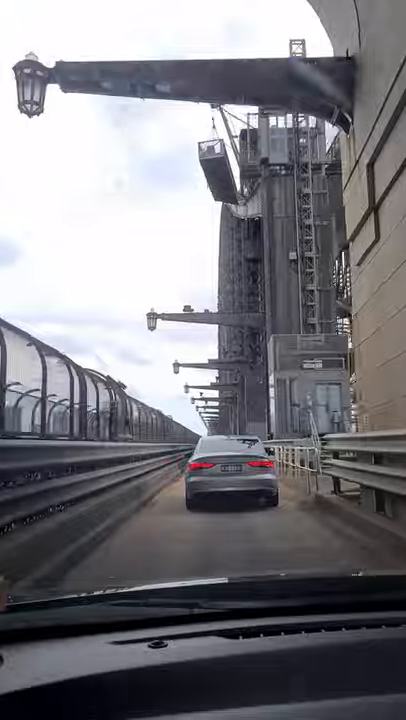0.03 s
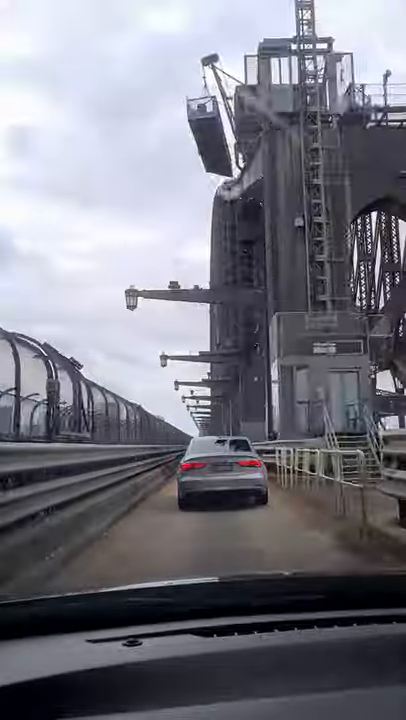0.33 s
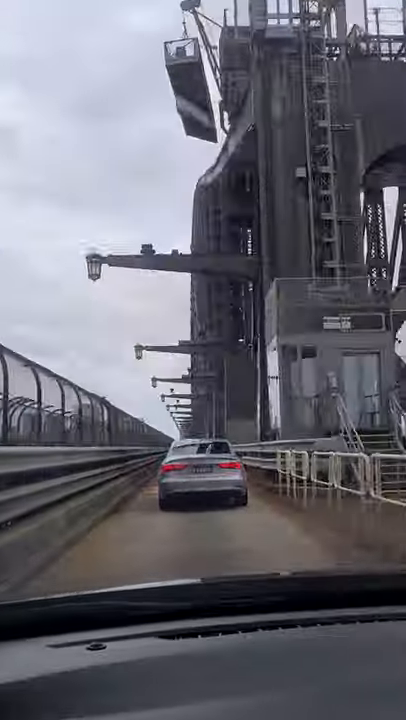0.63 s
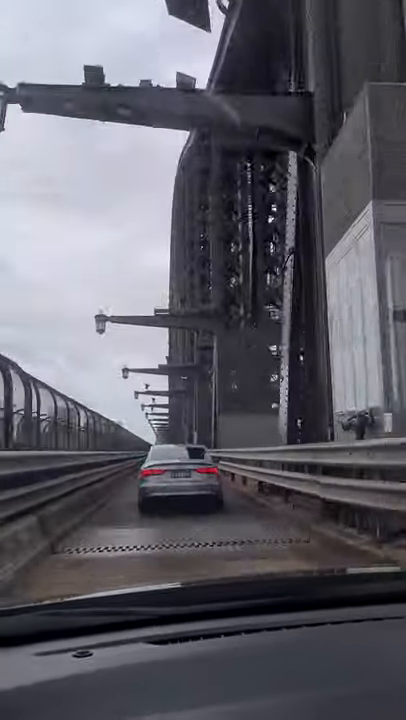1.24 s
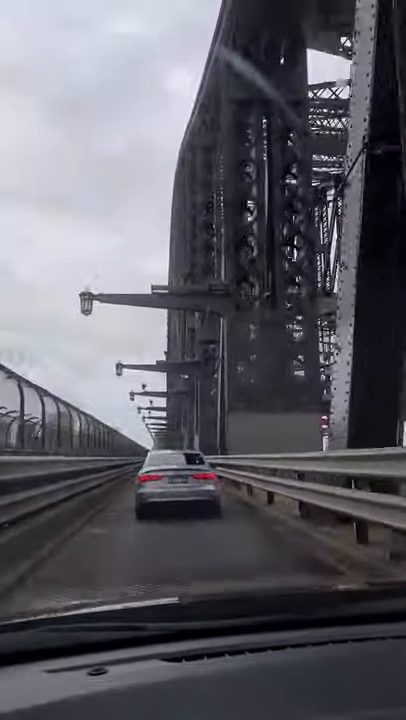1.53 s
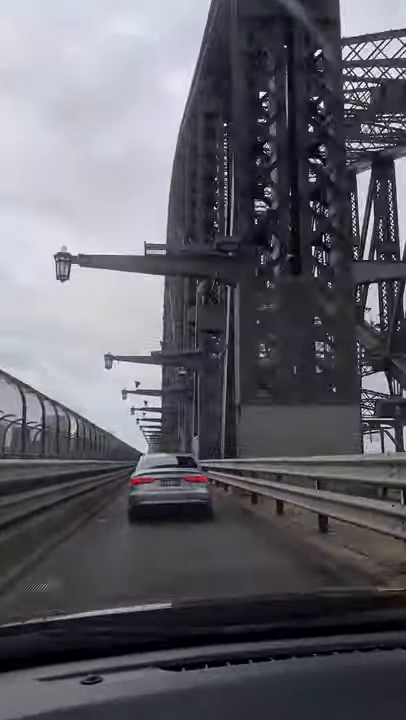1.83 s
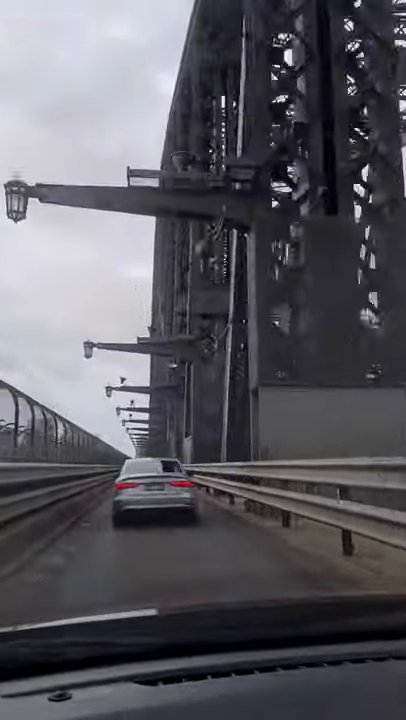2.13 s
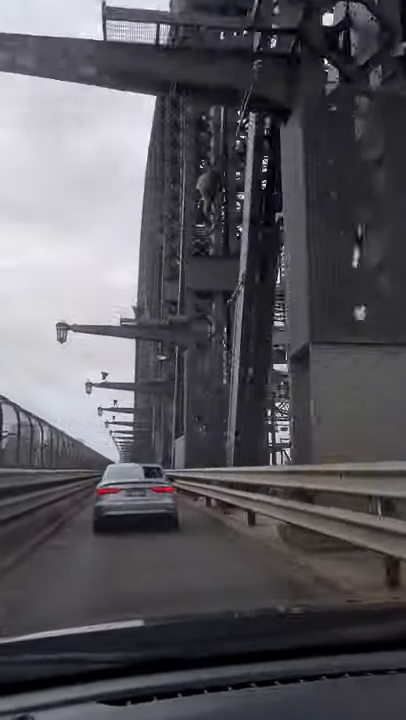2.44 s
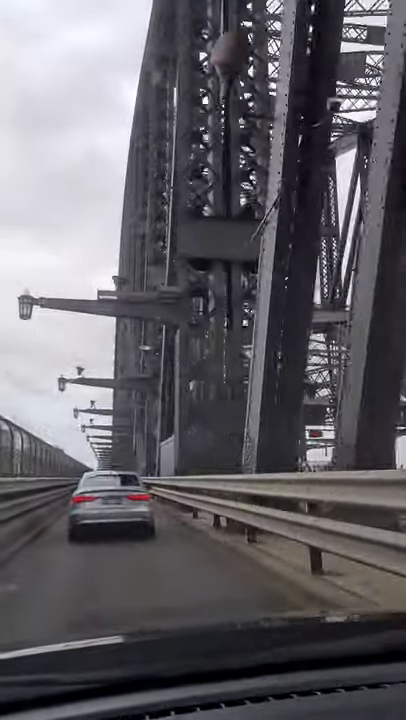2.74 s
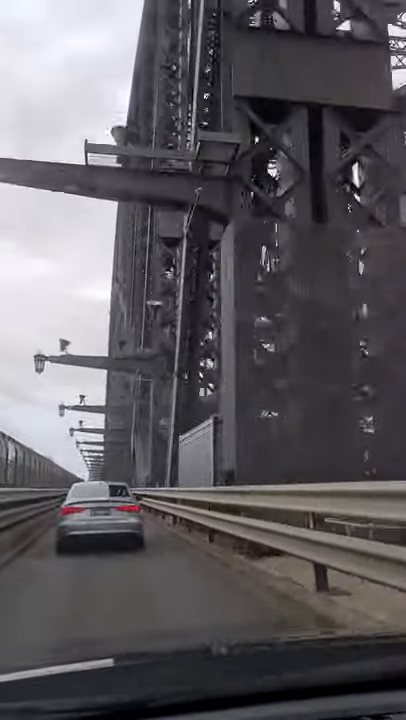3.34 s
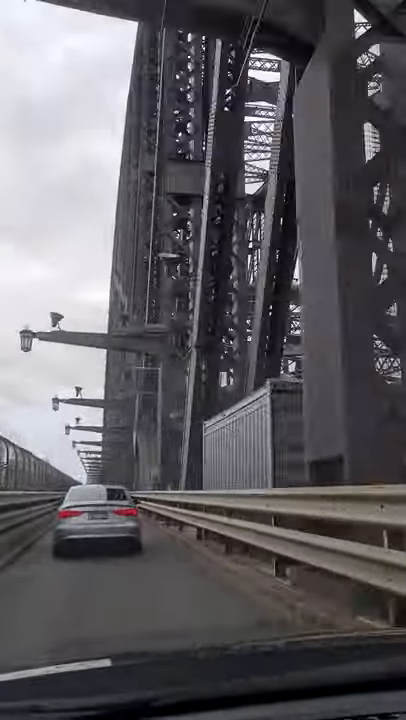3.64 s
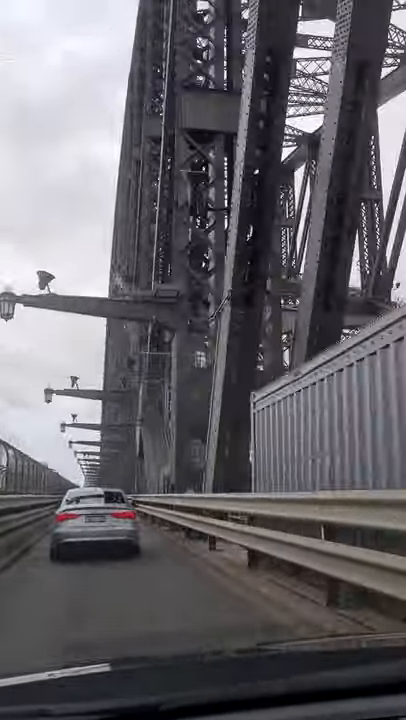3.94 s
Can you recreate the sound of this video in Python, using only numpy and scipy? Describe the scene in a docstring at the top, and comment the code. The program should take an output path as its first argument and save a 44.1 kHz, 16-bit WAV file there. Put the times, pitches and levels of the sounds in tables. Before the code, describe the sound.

A car drives steadily, heard from inside, thumping once with each axle over a ribbed joint.

```python
"""Driving over a steel bridge

Heard from inside the car, a stereo microphone behind the windscreen. The car gathers speed gently and the
engine booms in the cabin over road rumble and tyre roar. Midway both axles cross a ribbed expansion joint:
the body thumps, the ribs drum through the tyres, loose trim ticks. Trim squeaks faintly as the car sways."""
import sys
import numpy as np
from scipy import signal
from scipy.fft import rfft, irfft
from scipy.io import wavfile

SR = 44100
rng = np.random.default_rng(int(sys.argv[2]) if len(sys.argv) > 2 else 0)


def digitize_waveform(pressure):
    """Quantize a signal to 16-bit integers and store it at the path in sys.argv[1].

    Rows of a 2-D input are taken as channels; values are limited to [-1, 1].
    """
    field = np.atleast_2d(pressure).T
    bounded = np.clip(field, -1, 1)
    quanta = np.round(bounded * 32767).astype(np.int16)
    wavfile.write(sys.argv[1], SR, quanta)


N = 176400
TIME = np.arange(N) / SR
FREQ = np.fft.rfftfreq(N, 1 / SR)

# rush of the tyres on steel: frequency_hz, level_db
STEEL_RUSH = [(50, -20.5), (110, 3.5), (180, 4), (235, -0.5), (280, -9), (340, -7.5), (480, -15),
              (700, -18.5), (950, -20.5), (1400, -24), (2200, -39), (3500, -53), (6000, -65)]
# balance of the cabin noise at the microphone: frequency_hz, left_minus_right_db
CABIN_BALANCE = [(40, 0.5), (190, -0.5), (340, 4), (520, 3), (690, -4), (780, 1.5), (1000, -4), (1110, -3),
                 (1250, -4), (1700, -1), (2400, -0.5), (3050, 2.5), (4000, -4), (7000, -9), (8300, -4.5),
                 (9600, -18), (12000, -10.5)]


def engine(waver_db=.97, overtone_waver_db=2.5, drone_hz=151.5, drone_width_hz=3.2, drone_db=15):
    """The firing booms in the cabin; as it quickens, its second harmonic fades and its third resonates."""
    # engine speed: time_s, firing_hz
    firing = [(0, 47.53), (.6, 48.1), (1.2, 47.84), (1.8, 48.97), (2.5, 49.36), (3.2, 50.15), (4, 50.81)]
    # the boom under changing load: time_s, level_db
    load = [(0, -31), (.25, -23.5), (.7, -24.5), (1.0, -19.5), (1.3, -19), (1.5, -23), (2.1, -23),
            (2.7, -19.5), (3.4, -22), (4, -19.5)]
    # overtones: firing_multiple, level_against_boom_db, change_at_speed_db
    overtones = [(2, -14, -10.5), (3, -25, 0.5), (4, -24, 0), (5, -31.5, 6)]
    hz = curve(firing)
    angle = 2 * np.pi * np.cumsum(hz) / SR
    lag_s = np.array([[.0004], [0]])  # the boom reaches the left side later
    out = np.sin(angle - 2 * np.pi * hz * lag_s) * amp(waver_db * drift(rate_hz=2.1))
    sped_up = np.clip((hz - 50) / .4 + .5, 0, 1)  # 0 to 1 as the firing passes 50 Hz
    for order, db, change_db in overtones:
        resonance_db = drone_db / (1 + ((order * hz - drone_hz) / (drone_width_hz / 2)) ** 2)
        tone = np.sin(order * angle + 2 * np.pi * rng.random())
        out += tone * amp(db + change_db * sped_up + resonance_db + overtone_waver_db * drift(rate_hz=4.9))
    return np.sqrt(2) * out * amp(curve(load)) * pan(db=-.5)


def joint():
    """Both axles cross the expansion joint, just under the floor; its steel plates ring hollow."""
    # tyres rushing over the plates: middle_s, half_length_s, level_db
    crossings = [(1.728, 0.023, -31), (1.835, .055, -25), (1.965, .07, -28)]
    # heavy thumps of the body: middle_s, peak_db, pitch_hz
    thumps = [(1.706, -13.5, 42.2), (1.814, -14.5, 43.3), (1.945, -8, 43.3), (2.065, -8.5, 38.3)]
    # tyres slapping the plate edges: start_s, peak_db, pitch_hz
    slaps = [(1.652, -12, 150), (1.706, -16.5, 151), (1.859, -18.5, 153), (1.894, -13, 125),
             (1.927, -18.5, 177), (1.968, -16.5, 141.4), (2.163, -19, 135.6)]
    # tyres drumming on the ribs: start_s, length_s, peak_db, first_rate_hz, last_rate_hz
    rib_runs = [(1.724, 0.105, -12, 129.6, 122.9), (1.805, .082, -11.5, 111.6, 104.6),
                (1.92, 0.14, -20.5, 104.5, 134.8)]
    rush = cabin_noise(STEEL_RUSH)
    plate_ring = amp(-21) * ringing(hz=449, width_hz=35)
    out = (rush + plate_ring) * swells(crossings)
    for middle_s, db, hz in thumps:
        out += amp(db) * body_thump(middle_s, hz)
    for start_s, db, hz in slaps:
        add(out, start_s, amp(db) * tyre_slap(hz))
    for start_s, length_s, db, first_hz, last_hz in rib_runs:
        add(out, start_s, amp(db) * rib_drum(length_s, first_hz, last_hz))
    return out + clatter() + knock()


def body_thump(middle_s, hz, width_s=.021):
    """The body heaves on its springs: two or three deep cycles."""
    t = TIME - middle_s
    return np.exp(-.5 * (t / width_s) ** 2) * np.sin(2 * np.pi * hz * t)


def tyre_slap(hz, rise_s=.0075, grit=.21):
    """A tyre meets a plate edge with a cushioned blow: a few cycles that swell and die away."""
    t = np.arange(SR // 3) / SR
    swell = (t / rise_s * np.exp(1 - t / rise_s)) ** 2
    return swell * (np.sin(2 * np.pi * hz * t) + grit * cabin_noise(STEEL_RUSH)[:, :len(t)])


def rib_drum(length_s, first_hz, last_hz, roughness=.26, octave_db=-21):
    """A tyre rolls over evenly spaced ribs: a rough low note that glides with the rib rate."""
    progress = np.linspace(0, 1, round(length_s * SR))
    angle = 2 * np.pi * np.cumsum(first_hz + (last_hz - first_hz) * progress) / SR
    note = np.sin(angle) + amp(octave_db) * np.sin(2 * angle)
    swell = np.sqrt(abs(np.sin(np.pi * progress)))
    return swell * note * (1 + roughness * drift(rate_hz=47)[:len(note)])


def clatter(clicks_per_s=600, spread_db=3):
    """Grit and loose fittings make small, uneven clicks while the tyres are on the ribs."""
    # colour of the clicks: frequency_hz, level_db
    colour = [(500, -17), (1500, 2.5), (2500, 2), (4000, -8.5), (6500, -24.5), (9000, -27.5), (15000, -36)]
    # bursts of clatter: middle_s, half_length_s, level_db
    bursts = [(1.72, 0.029, -55.5), (1.835, 0.043, -57.5)]
    hits = rng.random((2, N)) < clicks_per_s / SR
    sizes = amp(spread_db * np.minimum(rng.exponential(1, (2, N)), 3))
    clicks = hits * sizes * rng.choice([-1, 1], (2, N))
    side_db = spectrum(CABIN_BALANCE) / 2
    response = amp(spectrum(colour) + np.array([side_db, -side_db]))
    return unit(irfft(rfft(clicks) * response, N)) * swells(bursts)


def knock(at_s=1.702, edge_s=.00004, body_s=.00011):
    """A loose fitting knocks once, hard, as the front wheels meet the joint."""
    edge, body = (TIME - at_s) / edge_s, (TIME - at_s) / body_s
    return amp(-33.5) * (edge * np.exp(-edge ** 2) + amp(-1) * body * np.exp(-body ** 2))


def road_rumble(lumps_db=.2):
    """The roughness of the road comes up through the suspension."""
    # colour of the rumble: frequency_hz, level_db
    colour = [(10, -27.5), (24, -12), (34, -7), (44, 1.5), (62, -1), (75, -5), (100, -4), (135, -1.5),
              (168, -7), (200, -9), (270, -17), (330, -15.5), (400, -19.5), (500, -21.5), (640, -31),
              (900, -45.5), (2000, -94)]
    # rougher and smoother stretches: time_s, level_db
    level = [(0, -27), (.6, -26), (1.2, -27), (1.65, -25), (2.1, -28), (2.5, -28.5), (3.0, -28),
             (3.5, -26.5), (4, -28)]
    return cabin_noise(colour) * amp(curve(level) - lumps_db * drift(rate_hz=4))


def wheels():
    """The wheels hop on their springs and the hollow tyres hum."""
    # wheel hop: time_s, level_db
    hop_level = [(0, -37.5), (.5, -36.5), (.72, -23), (.95, -42.5), (1.3, -25.5), (1.65, -28.5),
                 (2.0, -26.5), (2.25, -31.5), (2.5, -34), (3.2, -30), (3.45, -43), (4, -33.5)]
    # tyre hum: time_s, level_db
    hum_level = [(0, -34.5), (.55, -31), (1.1, -36.5), (1.7, -34), (2.2, -38), (2.8, -39.5), (3.5, -32.5),
                 (4, -33)]
    hop = ringing(hz=31.5, width_hz=5.6) * amp(curve(hop_level))
    hum = ringing(hz=161.8, width_hz=26) * amp(curve(hum_level))
    return hop + hum


def tyre_roar(span_from_s=1.85, crossfade_s=.059, flutter_db=.72):
    """The tyres roar outside the glass, fluttering with the grain of the asphalt."""
    # roar on the approach: frequency_hz, level_db
    approach = [(200, -31.5), (500, -10), (660, 2.5), (800, -1), (930, -2), (1100, -1.5), (1350, -1.5),
                (1650, -8), (2000, -14.5), (2400, -20), (2900, -24.5), (3600, -31.5), (4600, -40.5),
                (8000, -63.5)]
    # roar on the smoother span: frequency_hz, level_db
    span = [(200, -31), (500, -3), (680, -0.5), (800, -2), (1000, -2), (1150, -4.5), (1450, -3.5),
            (1650, -7), (1900, -12), (2400, -20.5), (2900, -23.5), (3600, -33.5), (4600, -42.5),
            (8000, -62)]
    # strength of the roar: time_s, level_db
    level = [(0, -42), (.25, -42.5), (.6, -41.5), (1.2, -41.5), (1.6, -41.5), (1.95, -44.5), (2.15, -44),
             (2.6, -42.5), (3.1, -42), (3.5, -41.5), (4, -41)]
    on_span = np.clip((TIME - span_from_s) / crossfade_s + .5, 0, 1)
    roar = np.sqrt(1 - on_span) * cabin_noise(approach) + np.sqrt(on_span) * cabin_noise(span)
    return roar * amp(curve(level) + flutter_db * drift(rate_hz=22))


def trim_ticks():
    """Loose plastic trim ticks when jolted, to the right of the microphone."""
    # ticks: start_s, level_db, centre_hz, width_octaves, decay_s, left_minus_right_db
    ticks = [(1.7165, -53.5, 15000, .2, 0.0042, -17), (1.716, -64, 6000, .4, 0.005, -12),
             (1.731, -62, 10000, .3, .005, -19.5), (1.782, -61.5, 4500, .4, .005, -6),
             (1.871, -62.5, 14700, .25, .007, -16), (1.869, -64, 6260, 0.16, 0.0046, -8),
             (3.265, -76.5, 5800, .3, .007, -12), (3.52, -79, 7100, .6, .008, -14),
             (3.897, -73.5, 8000, .6, .007, -12)]
    out, t = np.zeros((2, N)), np.arange(SR // 10) / SR
    for start_s, db, hz, octaves, decay_s, pan_db in ticks:
        band = np.exp(-.5 * (np.log2((FREQ + 1) / hz) / octaves) ** 2)
        tick = shaped_noise(band)[:len(t)] * np.exp(-t / decay_s)
        add(out, start_s, amp(db) * pan(pan_db) * tick)
    return out


def trim_rustle(flutter_db=.7):
    """Trim shaken by the asphalt gives a fine, high rustle."""
    # colour of the rustle: frequency_hz, level_db
    colour = [(2000, -4), (4000, -2), (6000, 1), (7400, 3), (8100, -2), (8700, -8), (9800, -5.5),
              (12000, -8.5), (15500, -13)]
    # strength of the rustle: time_s, level_db
    level = [(0, -70.5), (.22, -73), (.5, -75.5), (.75, -80), (1.35, -70.5), (1.6, -72.5), (1.72, -66.5),
             (1.87, -67), (2.0, -70.5), (2.35, -71.5), (2.52, -69.5), (2.65, -76), (3.0, -78), (3.1, -72.5),
             (3.2, -79.5), (4, -79)]
    return cabin_noise(colour) * amp(curve(level) + flutter_db * drift(rate_hz=30))


def trim_squeaks(bend=.07, jitter=.017, scratch_db=4):
    """Plastic trim squeaks faintly in small, scratchy arches of pitch."""
    # squeaks: start_s, length_s, level_db, top_pitch_hz, left_minus_right_db
    squeaks = [(0.259, .15, -82.5, 7200, -3), (.44, .1, -78, 7420, 1.5), (.885, .05, -86.5, 10300, -16),
               (1.186, .045, -83, 11400, -16), (2.13, .04, -75, 7500, -7), (2.255, 0.058, -75, 7600, -2),
               (2.402, .08, -73.5, 7400, -8), (2.484, 0.099, -75, 7500, -5)]
    out = np.zeros((2, N))
    for start_s, length_s, db, top_hz, pan_db in squeaks:
        arch = abs(np.sin(np.linspace(0, np.pi, round(length_s * SR))))
        hz = top_hz * (1 - bend * (1 - arch) + jitter * drift(rate_hz=400)[:len(arch)])
        scratch = unit(amp(scratch_db * drift(rate_hz=250)[:len(arch)]))
        tone = np.sin(2 * np.pi * np.cumsum(hz) / SR)
        add(out, start_s, amp(db) * pan(pan_db) * scratch * np.sqrt(2 * arch) * tone)
    return out


def cabin_noise(colour):
    """Noise coloured by the cabin: alike left and right in the bass, diffuse higher up."""
    # likeness of the microphone's two sides: frequency_hz, coherence
    likeness = [(30, 0.98), (110, 1), (180, 0.93), (300, 0.91), (480, .66), (650, 0.49), (1000, 0.099),
                (1550, 0.28), (2500, .15), (8000, .3)]
    # phase between the sides: frequency_hz, left_lead_rad
    lead = [(40, 0.52), (200, -0.49), (430, 1), (860, -0.07), (1210, -1.5), (1550, -3.5), (2070, -6),
            (2500, -6), (2840, -7.5)]
    # standing waves of the cabin: centre_hz, width_hz, lift_db
    standing_waves = [(223, 8.8, 2.5), (307, 16, 2.5), (480, 41, 2), (660, 67, -3.5), (938, 24, 3),
                      (1023, 50, 3.5), (1260, 56, 2.5), (1867, 56, 3.5)]
    left, diffuse = rfft(rng.standard_normal((2, N)))
    coherence, side_db = spectrum(likeness), spectrum(CABIN_BALANCE) / 2
    right = (coherence * left + np.sqrt(1 - coherence ** 2) * diffuse) * np.exp(-1j * spectrum(lead))
    sides = np.array([left * amp(side_db), right * amp(-side_db)])
    waves_db = sum(db / (1 + (2 * (FREQ - hz) / width) ** 2) for hz, width, db in standing_waves)
    return unit(irfft(sides * amp(spectrum(colour) + waves_db), N))


def ringing(hz, width_hz):
    """A resonance kept ringing by the road."""
    return shaped_noise(1 / (1 + ((FREQ - hz) / (width_hz / 2)) ** 4))


def drift(rate_hz):
    """A random wander, mostly slower than the given rate."""
    return shaped_noise(1 / (1 + (FREQ / rate_hz) ** 4))


def shaped_noise(response):
    """Filtered noise with an rms of one."""
    return unit(irfft(rfft(rng.standard_normal(N)) * response, N))


def swells(rows):
    """A gain that rises and falls once for each row."""
    return sum(amp(db) / (1 + ((TIME - middle_s) / half_s) ** 4) for middle_s, half_s, db in rows)


def curve(points):
    """Joins points over the whole scene."""
    return np.interp(TIME, *np.transpose(points))


def spectrum(points):
    """Joins points on a logarithmic frequency axis."""
    hz, value = np.transpose(points)
    return np.interp(np.log(FREQ + 1), np.log(hz + 1), value)


def amp(db):
    """Decibels to gain."""
    return 10 ** (np.asarray(db) / 20)


def unit(x):
    """Scales to an rms of one."""
    return x / np.sqrt(np.mean(x ** 2) + 1e-20)


def pan(db):
    """Left and right gains for a level difference."""
    return amp([[db / 2], [-db / 2]])


def add(mix, start_s, sound):
    """Mixes a sound in at a time."""
    part = mix[:, round(start_s * SR):][:, :sound.shape[-1]]
    part += sound[..., :part.shape[1]]


def scene():
    """Everything heard from behind the windscreen."""
    driving = engine() + wheels() + road_rumble() + tyre_roar() + trim_rustle()
    return driving + joint() + trim_ticks() + trim_squeaks()


def record(dry, open_at_s=.069, fade_s=.004, cutoff_hz=15700):
    """The microphone opens after a moment of silence and loses the highest treble."""
    opened = dry * np.clip((TIME - open_at_s) / fade_s, 0, 1)
    lowpass = signal.firwin(511, cutoff_hz, window=("kaiser", 9), fs=SR)
    return signal.oaconvolve(opened, lowpass[None], "same")


dry = scene()
out = record(dry)
digitize_waveform(out)
```